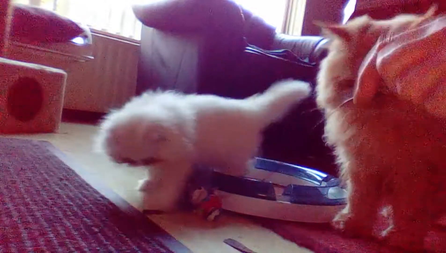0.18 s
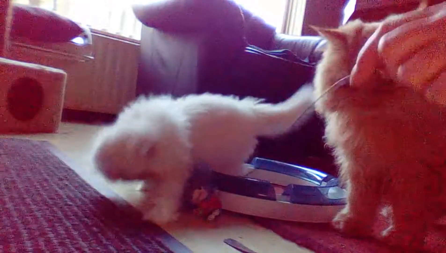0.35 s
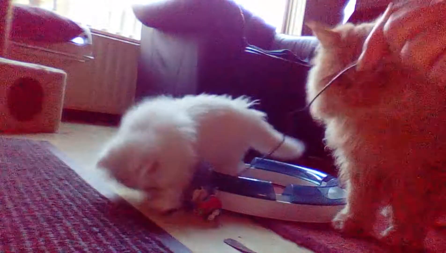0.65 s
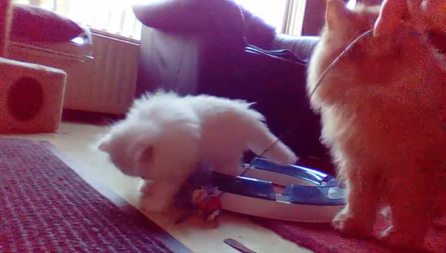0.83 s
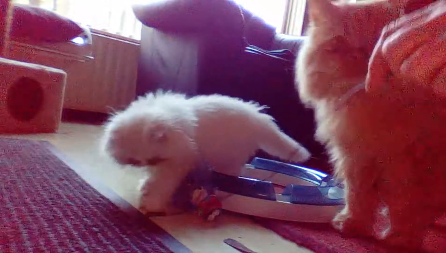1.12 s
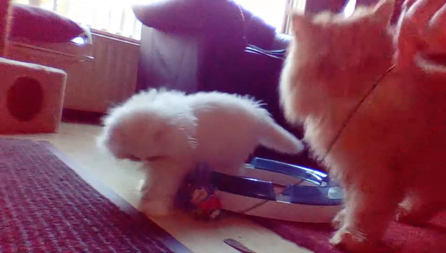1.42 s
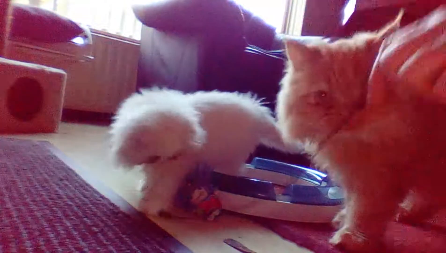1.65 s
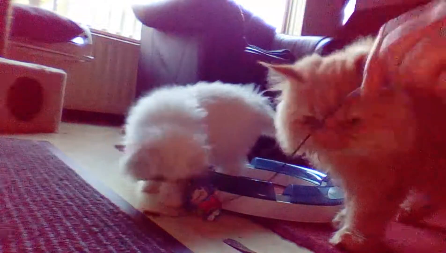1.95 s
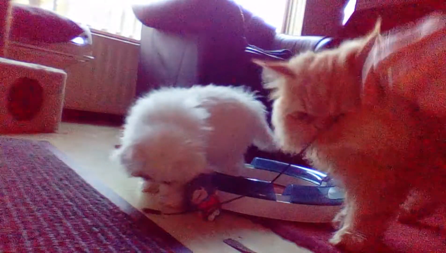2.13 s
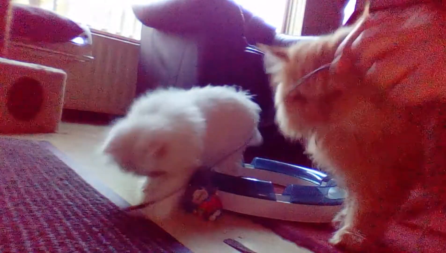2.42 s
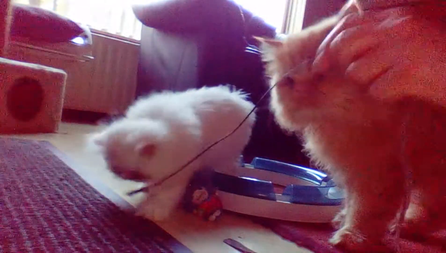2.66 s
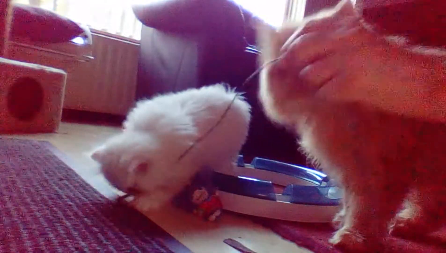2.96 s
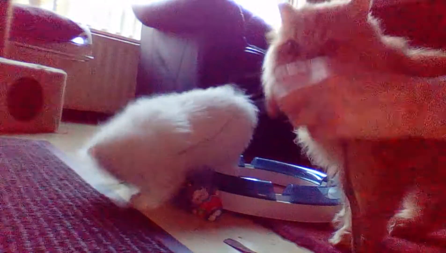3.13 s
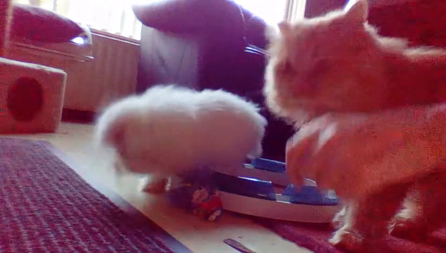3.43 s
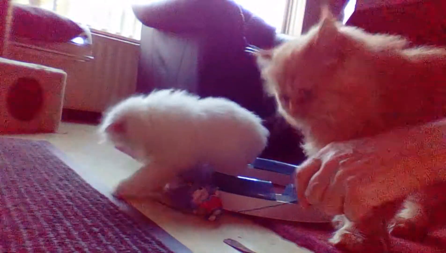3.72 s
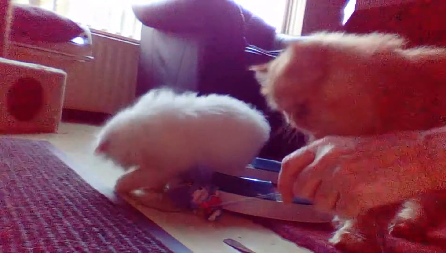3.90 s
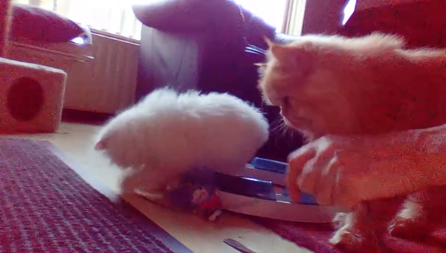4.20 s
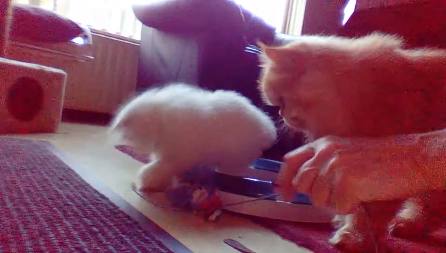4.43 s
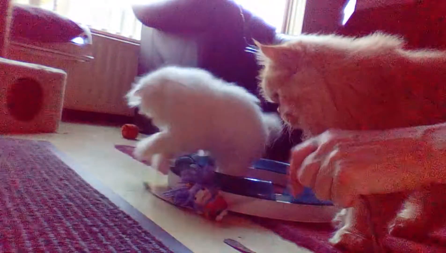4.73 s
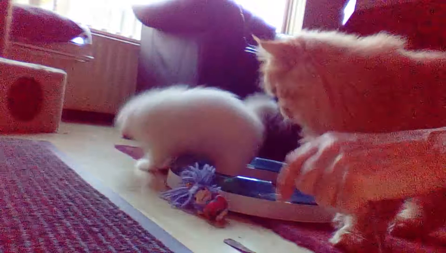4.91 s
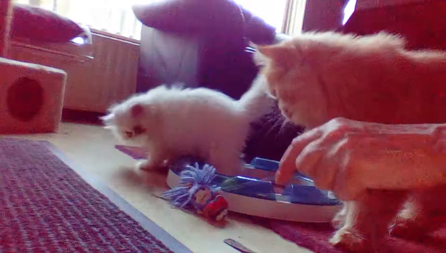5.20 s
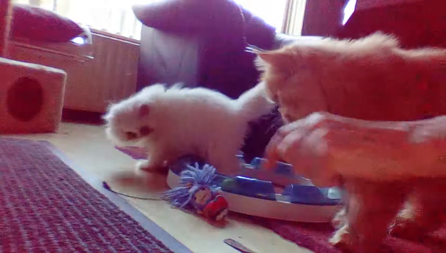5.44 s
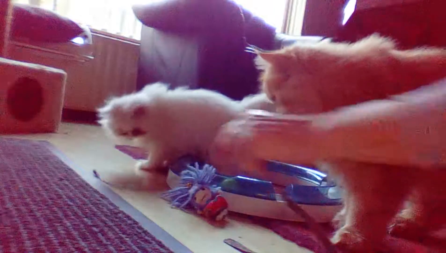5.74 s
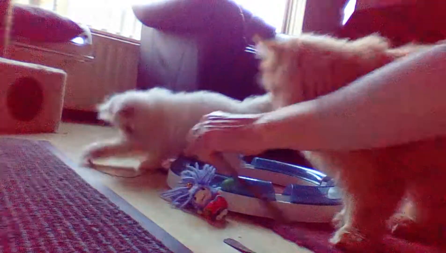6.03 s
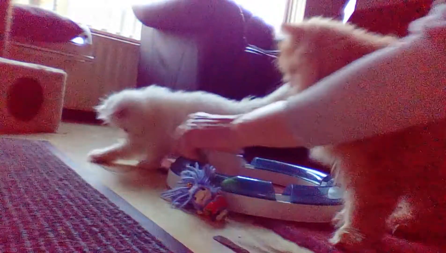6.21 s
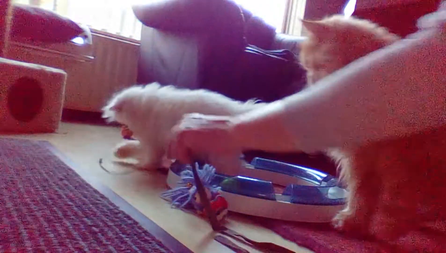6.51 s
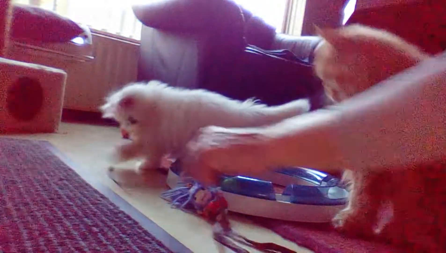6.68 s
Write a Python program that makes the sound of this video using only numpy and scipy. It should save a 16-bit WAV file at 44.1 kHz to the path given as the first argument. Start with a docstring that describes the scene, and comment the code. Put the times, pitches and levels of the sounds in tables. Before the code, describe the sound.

Close, slightly left-leaning stereo of claws and a thin wand tip striking plastic and floor. Hard clicks ring briefly, with tiny rattles and faint hollow knocks; short gritty scrapes run between them. The play is busy at first, thins out, bursts sharply mid-way, then dwindles to light scratching, faint cloth hiss and near quiet. A soft low hum and airy room noise continue throughout.

```python
"""A thin wand and small claws tap, skip and scrape over floor, rug and a plastic ball-track toy.
Kittens are playing in a small living room. Taps are short clicks that set plastic ringing; scrapes are
runs of tiny slips. The toy rattles in bursts and knocks with low fading tones, paws thud as slow sine
cycles, cloth and shuffling pads are swelling noise, and a low mains hum lies over soft air noise."""
import sys
import numpy as np
from scipy import signal
from scipy.fft import rfft, irfft
from scipy.io import wavfile

SR = 44100
rng = np.random.default_rng(int(sys.argv[2]) if len(sys.argv) > 2 else 0)


def pcm_store(signal):
    """Save signal as 16-bit PCM."""
    levels = np.round(np.clip(np.atleast_2d(signal), -1, 1) * 32767)
    wavfile.write(sys.argv[1], SR, levels.astype(np.int16).T)


N = 302526
TIME = np.arange(N) / SR

# All event levels are relative: the gains in the functions and the room also shape them.
# sharp taps of wand tip and claws: [t/s, level/dB, low clack against bright tick/dB]
TAP_EVENTS = [(0.039, -13.5, -16), (0.1463, -39, -59), (0.2087, -42.5, -4.5), (0.2326, -22, -20),
              (0.2382, -28.5, -5), (0.3354, -41, -24), (0.9942, -25, -9.5), (1.3462, -26, -28),
              (1.653, -37, -28), (1.8861, -14.5, -16.5), (1.9781, -53, 12), (2.0625, -30, -5.5),
              (2.4844, -34, 4), (2.5187, -40.5, 5), (3.5423, -30.5, -3.5), (3.5506, -10.5, -13.5),
              (3.6243, -21.5, -10), (3.6284, -20.5, -8.5), (3.678, -21.5, -12), (4.086, -42, -5.5),
              (4.138, -52, 0), (4.9042, -36, -14), (5.3013, -44, -8), (5.3667, -38, 3.5),
              (6.114, -52.5, -14)]
# strokes over floor and rug: [t/s, length/s, level/dB, place of the hardest push 0-1,
# landing snap against the rub/dB, brightness/dB per octave, left over right/dB]
STROKE_EVENTS = [ (0.0, 0.079, -49, 0, 31, 6, 5.5), (0.369, 0.062, -59.5, 0.93, 10, -2, 3),
                 (0.61, 0.078, -45, 0.38, 22, 0, 3.5), (0.721, 0.051, -47.5, 0.57, 24.5, 1, 4.5),
                 (0.801, 0.076, -56, 0.57, 36.5, -0.5, 3.5), (0.885, 0.087, -40, 0.98, -3, 0, 3.5),
                 (1.055, 0.087, -52, 0.55, 24, -0.5, 3), (1.236, 0.13, -47, 0.8, 14, 0, 5.5),
                 (1.331, 0.14, -41, 0.38, 31, 0.4, 4), (1.487, .05, -50.5, 0.55, 17, 0, 4.5),
                 (1.546, 0.1, -39.5, 0.29, 24.5, 0.5, 3), (2.115, 0.073, -62.5, .3, 19, -2.5, 2),
                 (2.193, .028, -46.5, 0.64, 1, -1, 2), (2.235, 0.041, -61, 0.2, 15, -3.5, 4),
                 (3.935, 0.03, -58, .05, 33.5, 0.5, 5), (3.974, 0.064, -50.5, 0.2, 17, -1, 3.5),
                 (4.094, .075, -62, .6, 11, -2, 4.5), (4.344, .07, -69.5, 0.4, 26, -1.5, 9),
                 (4.514, 0.025, -70.5, 0.3, 28, -4, 8), (4.836, 0.018, -58.5, .1, 27, -0.5, 5),
                 (4.859, 0.078, -47, 0.51, 25.5, -1.1, 3.5), (4.946, 0.05, -40, 0.35, 15, -0.5, 6),
                 (5.137, 0.087, -48.5, 0.14, 28.5, 0.5, 4), (5.234, 0.047, -54.5, .15, 22, -1, 7),
                 (5.327, 0.03, -46, 0.93, 14, 1.5, 3), (5.37, .065, -62.5, 0, 15, -3, 1),
                 (6.606, .17, -49.5, 0.53, 30.5, -1.5, 2), (6.782, 0.075, -45.5, 0.93, 24, 0.7, 2.5)]
# quick rebounds inside the struck toy: [t/s, level/dB, decay/s]
RATTLE_EVENTS = [(0.240, -23.5, 0.0044), (3.552, -14, 0.0028), (3.625, -29, 0.0032), (3.680, -23, 0.0025)]
# hollow knocks, each on another part of the shell: [t/s, level/dB, pitch factor]
KNOCK_EVENTS = [(0.038, -42, 1.03), (0.24, -53, 0.92), (0.996, -57, 1.13), (1.889, -52.5, 1),
                (2.062, -54, 1.14), (2.487, -42.5, 1), (2.521, -47.5, 1.1), (3.554, -47, .8),
                (3.629, -52, 1.1), (4.974, -59, 1.15), (5.368, -67, 0.88)]
# soft thuds of paws on the floor: [t/s, level/dB]
THUD_EVENTS = [(0.054, -46), (0.296, -60), (3.557, -49.5), (3.657, -51.5), (6.207, -53)]
# cloth sliding near the left microphone as the arm moves: [t/s, length/s, level/dB]
CLOTH_EVENTS = [(2.64, 0.14, -72), (2.80, 0.44, -71.5), (5.47, .27, -64), (5.62, 0.62, -78),
                (6.05, 0.25, -66.5), (6.26, 0.12, -67)]
# one thin squeak of the cloth: [t/s, length/s, level/dB]
SQUEAK_EVENTS = [(3.27, 0.12, -62.5)]
# paws shuffling on the floor: [t/s, length/s, level/dB]
SHUFFLE_EVENTS = [(1.96, 0.12, -58.5), (2.905, 0.068, -65.5), (3.0, 0.28, -68), (4.6, 0.22, -73.5)]

# sound colour of the bright part of a tap: [f/Hz, level/dB per Hz]
TICK_COLOUR = [(150, -25.5), (800, -34), (2000, -13), (3800, -4.5), (5500, -2), (6900, 1.5), (7500, -4.5),
               (8200, -18), (9700, -22), (10700, -36.5), (13000, -60.5)]
# sound colour of the duller part of a tap: [f/Hz, level/dB per Hz]
CLACK_COLOUR = [(120, -39.5), (400, -6.5), (700, -3), (1000, 4), (1700, 2), (2800, 2), (5000, -4),
                (9000, -44.5)]
# sound colour of the dragging tip: [f/Hz, level/dB per Hz]
SCRAPE_COLOUR = [(170, -36), (300, -11), (430, -8), (750, -12), (1100, -4), (1700, -5.5), (2800, -3),
                 (3900, 2.5), (5500, 0), (7000, 2), (7600, -11), (8300, -18.5), (10000, -28), (11500, -64)]
# sound colour of the rattling parts: [f/Hz, level/dB per Hz]
RATTLE_COLOUR = [(200, -27), (600, -8.5), (1000, -18.5), (1600, -4.5), (2200, 2.5), (3200, -1.5),
                 (4300, -2), (5600, 6), (7200, 5.5), (8200, -17.5), (10000, -34), (12000, -38.5)]
# sound colour of sliding cloth: [f/Hz, level/dB per Hz]
CLOTH_COLOUR = [(1000, -15), (1950, -12.5), (2700, -24), (4200, -14), (5500, -1), (6600, 3.5), (7300, -3),
                (8000, -16.5), (10500, -22.5), (13000, -53)]
# sound colour of the cloth squeak: [f/Hz, level/dB per Hz]
SQUEAK_COLOUR = [(3000, -40), (5000, -14.5), (5800, -13), (6200, 2), (6600, -11), (7600, -32), (10000, -44)]
# sound colour of the shuffling pads: [f/Hz, level/dB per Hz]
PAW_COLOUR = [(150, -38), (380, 5), (600, 0.5), (1100, -5.5), (2500, -18), (6000, -41)]

# ringing of the struck plastic: [f/Hz, width/Hz, level/dB]
PLASTIC_RING = [(2430, 69, -13.5), (3277, 29, -8.5), (3950, 46, 11.5), (4300, 45, -6), (4650, 26, -3.5),
                (5204, 32, 0), (5300, 120, -19), (5420, 360, -0.5), (5830, 280, -7), (6700, 330, -8),
                (8160, 110, -8)]
# hollow body of the toy, before pitch factor and ring share: [f/Hz, level/dB, time to fall 60 dB/s]
TOY_BODY = [(370, -14, .06), (425, 0, .085), (500, -14, .05), (1000, -14, .05)]
# nearby surfaces, left then right microphone, before the reach factor: [delay t/s, level/dB]
NEAR_ECHOES = [
    [(.00215, -13), (.0029, -5.5), (.0041, -8.5), (.0082, -10)],
    [(.0022, -1), (.0028, -12.5), (.0038, -1), (.0063, -30)],
]
# fading of the room: [f/Hz, time to fall 60 dB/s]
ROOM_FADE = [(100, 0.84), (500, 0.59), (2000, 0.39), (5000, 0.25), (9000, 0.18)]
# mains hum: [f/Hz, level/dB rms before panning]
HUM_TONES = [(50, -82), (100, -66), (120.5, -79.5), (150, -57.5), (200, -79)]
# sound colour of the still air: [f/Hz, level/dB per Hz]
AIR_COLOUR = [(20, -3.5), (45, -6), (75, 7), (110, 17), (160, 15), (240, 7), (300, 4.5), (410, 1.5),
              (650, -3.5), (1500, -8.5), (4000, -9.5), (7200, -12.5), (8500, -25.5), (14500, -27)]
# likeness of left and right in noise and room tail: [f/Hz, likeness 0-1]
LIKENESS = [(50, 0.69), (200, 0.27), (500, 0.25), (1500, 0.1), (5000, 0.035)]

SWELL_DB_PER_S, EASE_DB_PER_S = 118.5, 59.5  # the rub grows up to the hardest push and eases after it
LIFT_S = 0.007  # the tip leaves the surface
SLIPS_PER_S, CATCHES_PER_S = 1400, 120  # the tip slips all the time and now and then catches hard
CATCH_DB, RUB_DB = -3, -15  # against the slips
GLIDE_POWER = 1.46  # the sound of a soft slide follows its speed to this power
AIR_DB = -64  # rms
EDGE_HZ = 15200  # top of the recorder's band


def taps(tick_db=5, clack_db=3, side_db=4.0, count=3):
    """A bright tick and a duller clack; the tip skips a few times, and each place has its own echoes."""
    out = np.zeros((2, N))
    tick, clack = pulse(TICK_COLOUR), pulse(CLACK_COLOUR)
    tick /= abs(signal.hilbert(tick)).max()
    clack /= abs(signal.hilbert(clack)).max()
    for s, db, low_db in TAP_EVENTS:
        force = np.zeros(SR // 100)
        force[0] = 1
        skips = np.cumsum(rng.uniform(0.0005, 0.0018, count))
        skip_gains = amp(-13 - 2 * np.arange(count)) * rng.choice([-1, 1], count)
        force[(skips * SR).astype(int)] = skip_gains
        blow = amp(tick_db) * tick + amp(clack_db + low_db) * clack
        sound = panned(side_db + rng.standard_normal()) * convolve(force, blow)
        echoed = room(sound, wet_db=-7.0, reach=rng.uniform(0.83, 1.15))
        add(out, s + 0.00069, amp(db) * echoed)
    return ringing(out, ring_db=-9)


def scrapes(scrape_db=-3.5, wet_db=-10, count=6):
    """The tip lands with a snap and drags from spot to spot, each with its own colour and echoes."""
    out = np.zeros((2, N))
    hz = np.geomspace(150, 14000, num=64)
    t = np.arange(SR // 4) / SR
    for s, length, db, crest, land_db, tilt_db, side_db in STROKE_EVENTS:
        force, spot = slips(count=len(t), spots=count)
        force[:, 0] = amp(land_db)
        force *= amp(db) * panned(side_db) * pressure(t, length, crest)
        tilts = tilt_db + 1.3 * rng.standard_normal((count, 1))
        unevenness = 2.2 * rng.standard_normal((count, len(hz)))
        colours = read(SCRAPE_COLOUR, hz) + tilts * np.log2(hz / 4000) + unevenness
        for k in np.unique(spot).astype(int):
            click = pulse(np.c_[hz, colours[k]], size=1024)
            sound = convolve(force * (spot == k), click)
            add(out, s, room(sound, wet_db=wet_db, reach=rng.uniform(0.75, 1.3)))
    return amp(scrape_db) * out


def slips(count, spots):
    """Stick and slip: small snaps and sparse hard catches over a faint rub, with the spot of each."""
    t = np.arange(count) / SR
    sizes = amp(4.5 * np.minimum(rng.exponential(1, count), 3.6))
    sizes *= rng.choice([-1, 1], count)
    snaps = unit(sizes * (rng.random(count) < SLIPS_PER_S / SR))
    catches = unit(rng.uniform(0.46, 1, count) * (rng.random(count) < CATCHES_PER_S / SR))
    rub = amp(RUB_DB) * rng.standard_normal((2, count))
    spot = np.floor(14 * t + rng.random(count)) % spots  # neighbouring spots overlap at random
    return unit(snaps + amp(CATCH_DB) * catches + rub), spot


def pressure(t, length, crest):
    """One stroke: the push grows to its crest, eases off, and the tip lifts."""
    past = t - np.clip(crest, 0, 1) * length
    push_db = np.minimum(SWELL_DB_PER_S * past, -EASE_DB_PER_S * past)
    return amp(push_db) * np.exp(-np.maximum(t - length, 0) / LIFT_S)


def rattles(rebounds_per_s=2500):
    """Loose plastic parts buzz against each other for a few milliseconds and ring."""
    out, t = np.zeros((2, N)), np.arange(SR // 30) / SR
    for s, db, decay_s in RATTLE_EVENTS:
        signs = rng.choice([-1, 1], (2, len(t)))
        hits = rng.random((2, len(t))) < rebounds_per_s / SR
        force = signs * hits * np.exp(-t / decay_s)
        force /= np.linalg.norm(force, axis=1, keepdims=True) + 1e-9
        sound = room(convolve(force, pulse(RATTLE_COLOUR)), wet_db=-7)
        add(out, s, amp(db) * panned(4.18) * sound)
    return ringing(out, ring_db=-6.0)


def ringing(x, ring_db):
    """Each contact leaves the plastic ringing for a few milliseconds."""
    t = np.arange(SR // 20) / SR
    modes = np.zeros(len(t))
    for hz, width, db in PLASTIC_RING:
        fade = np.exp(-np.pi * width * t)  # a wider resonance dies sooner
        modes += amp(db) * 2 * np.pi * width / SR * fade * np.cos(2 * np.pi * hz * t)
    return x + amp(ring_db) * convolve(x, modes)


def knocks(knock_db=-0.5, ring_share=0.57):
    """The hollow shell of the toy rings low and briefly, its pitch set by where it is struck."""
    out, t = np.zeros(N), np.arange(SR // 5) / SR
    for s, db, pitch in KNOCK_EVENTS:
        shell = np.zeros(len(t))
        for hz, mode_db, t60 in TOY_BODY:
            fade = amp(mode_db - 60 * t / (t60 * ring_share))
            shell += fade * np.sin(2 * np.pi * hz * pitch * t)
        add(out, s, amp(knock_db + db) * shell)
    return out


def thuds(floor_hz=78):
    """A padded paw pushes the floor through a few slow cycles."""
    out, t = np.zeros(N), np.arange(SR // 5) / SR
    swell = t / 0.009  # the push is strongest after 9 ms
    push = swell * np.exp(1 - swell) * np.sin(2 * np.pi * floor_hz * t)
    for s, db in THUD_EVENTS:
        add(out, s, amp(db) * push)
    return out


def rustles(cloth_db=-2, squeak_db=-2, paw_db=-2):
    """Sliding cloth makes a smooth high hiss and one squeak; pads make a dull shuffle."""
    cloth = amp(cloth_db) * slides(CLOTH_EVENTS) * noise(CLOTH_COLOUR, LIKENESS)
    cloth += amp(squeak_db) * slides(SQUEAK_EVENTS) * noise(SQUEAK_COLOUR, LIKENESS)
    shuffle = amp(paw_db) * slides(SHUFFLE_EVENTS) * noise(PAW_COLOUR, LIKENESS)
    return panned(12.3) * cloth + shuffle


def slides(rows):
    """Gain of soft sliding movements: each swells and fades with its speed, in one arch."""
    gain = np.zeros(N)
    for s, length, db in rows:
        speed = np.sin(np.pi * np.clip((TIME - s) / length, 0, 1))
        gain += amp(db) * abs(speed) ** GLIDE_POWER
    return gain


def room(x, wet_db, reach=1, wall_s=0.021, wall_db=-2, lag_s=0.00007):
    """Direct sound, echoes off floor and furniture, then a short tail that swells as the far wall answers."""
    size = SR // 3
    sparse = rng.choice([-1., 1.], (2, size)) * (rng.random((2, size)) < 4000 / SR)
    hz, t, z = signal.stft(sparse, SR, nperseg=256)
    c = np.clip(read(LIKENESS, hz), -1, 1)[:, None]
    z[1] = c * z[0] + np.sqrt(1 - c ** 2) * z[1]  # the right tail is partly like the left
    z *= amp(-60 * t / read(ROOM_FADE, hz)[:, None])
    z *= 1 - np.exp(-(t / 0.005) ** 2)  # the tail builds up over some 5 ms
    z *= 1 + amp(wall_db) * np.exp(-((t - wall_s) / 0.0038) ** 2)
    response = signal.istft(z, SR)[1]
    response *= amp(wet_db) / np.linalg.norm(response, axis=1, keepdims=True)
    n = np.arange(SR // 50)
    for ear, lag, echoes in zip(response, (lag_s, 0), NEAR_ECHOES):  # the left ear lags
        ear[round(lag * SR)] += 1
        for s, db in echoes:
            ear[:len(n)] += amp(db) * np.sinc(n - (s * reach + lag) * SR)
    return convolve(x, response)


def background(hum_db=0):
    """Steady mains hum over the still air of the room."""
    hum = np.zeros(N)
    for hz, db in HUM_TONES:
        hum += amp(db) * np.sqrt(2) * np.sin(2 * np.pi * (hz * TIME + rng.random()))
    air = amp(AIR_DB) * noise(AIR_COLOUR, LIKENESS)
    return amp(hum_db) * panned(-1.7) * hum + air


def noise(colour, same):
    """Coloured noise at two microphones, partly alike."""
    hz = np.fft.rfftfreq(N, 1 / SR)
    a, b = rfft(rng.standard_normal((2, N)))
    c = np.clip(read(same, hz), -1, 1)
    pair = np.array([a, c * a + np.sqrt(1 - c ** 2) * b])
    return unit(irfft(pair * amp(read(colour, hz)), N))


def pulse(colour, size=2048):
    """The shortest causal click of a given colour, with energy 1."""
    log_gain = np.log(amp(read(colour, abs(np.fft.fftfreq(size, 1 / SR)))))
    spectrum = np.exp(np.conj(signal.hilbert(log_gain)))  # the phase that puts the energy first
    click = np.fft.ifft(spectrum).real[:size // 2]
    return click / np.linalg.norm(click)


def read(points, hz):
    """Reads a table of values against frequency on a log-frequency axis."""
    f, value = np.transpose(points)
    return np.interp(np.log(hz + 1), np.log(f + 1), value)


def convolve(x, response):
    """Filters each channel, adding the filter's tail but never running past N samples."""
    return signal.fftconvolve(np.atleast_2d(x), np.atleast_2d(response), axes=1)[:, :N]


def add(mix, s, sound):
    """Mixes a sound in at time s."""
    part = mix[..., max(round(s * SR), 0):][..., :sound.shape[-1]]
    part += sound[..., :part.shape[-1]]


def panned(db):
    """Left and right gains for a level difference; above zero the left is louder."""
    return amp(np.array([[db], [-db]]) / 2)


def amp(db):
    """Decibels to gain."""
    return 10 ** (np.asarray(db) / 20)


def unit(x):
    """Scales to rms 1."""
    return x / np.sqrt(np.mean(x ** 2) + 1e-20)


def scene():
    """All the play, over the hum; a high-pass, like a small microphone's, keeps deep bass out of the play."""
    play = taps() + scrapes() + rattles() + room(knocks(), wet_db=-11) + thuds() + rustles()
    bass_cut = signal.butter(4, 62, "high", fs=SR, output="sos")
    return signal.sosfilt(bass_cut, play) + background()


def record(dry):
    """The recorder's band limit: a steep filter takes away the highest treble."""
    low_pass = signal.firwin(511, EDGE_HZ, window=("kaiser", 9), fs=SR)
    return signal.oaconvolve(dry, low_pass[None], "same")


dry = scene()
out = record(dry)
pcm_store(out)
```